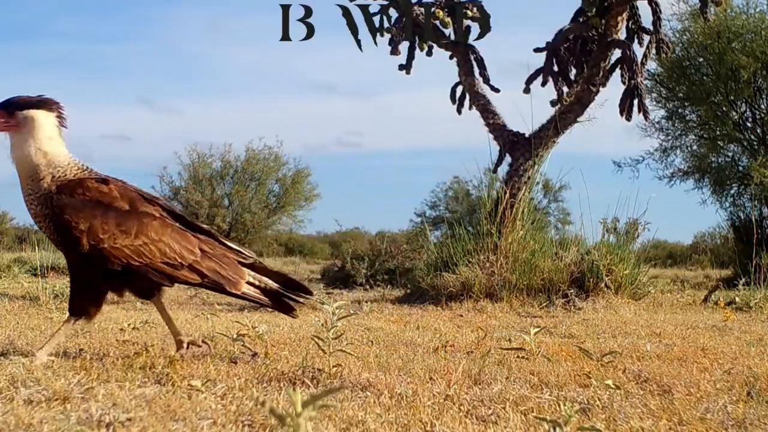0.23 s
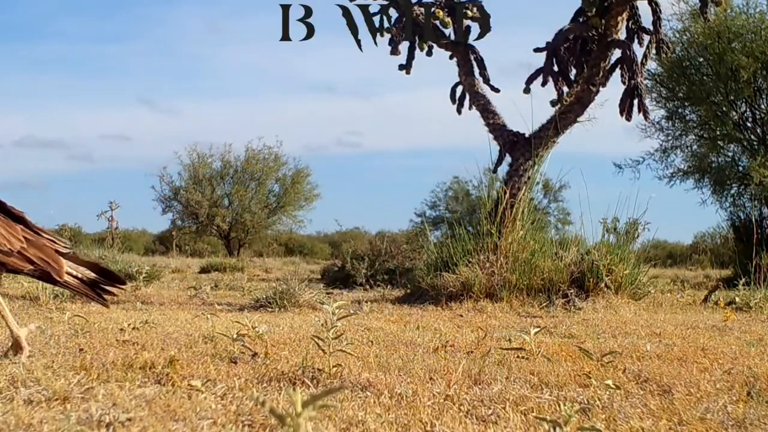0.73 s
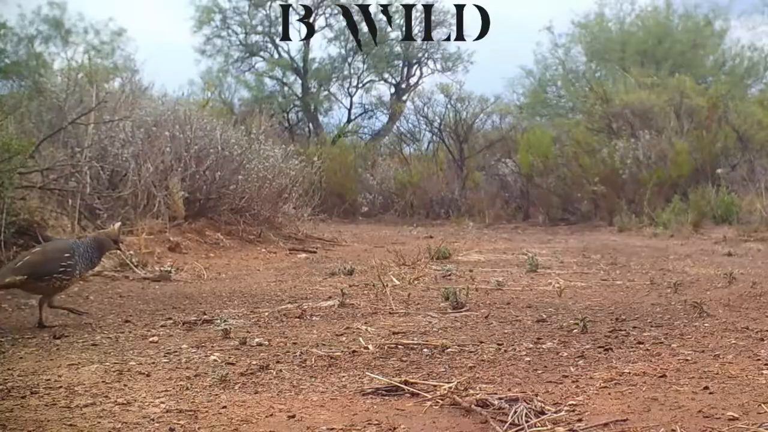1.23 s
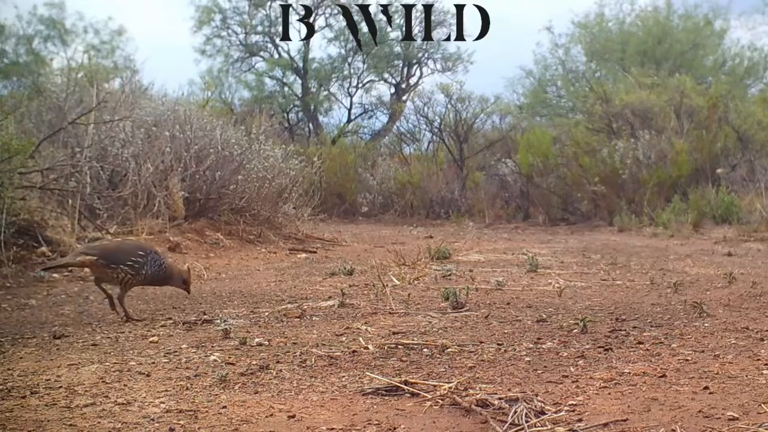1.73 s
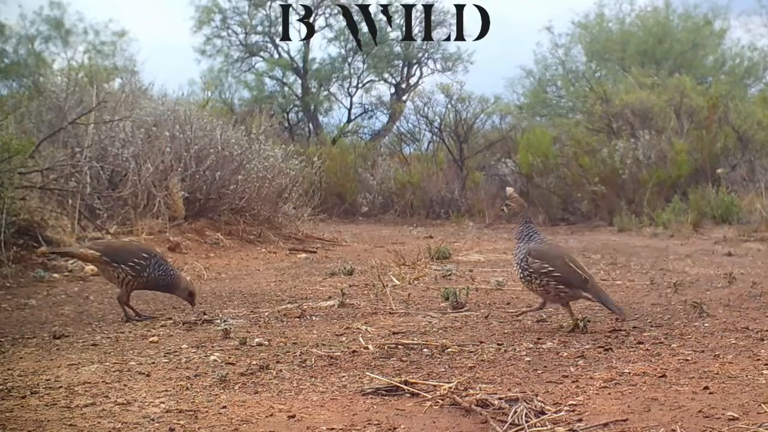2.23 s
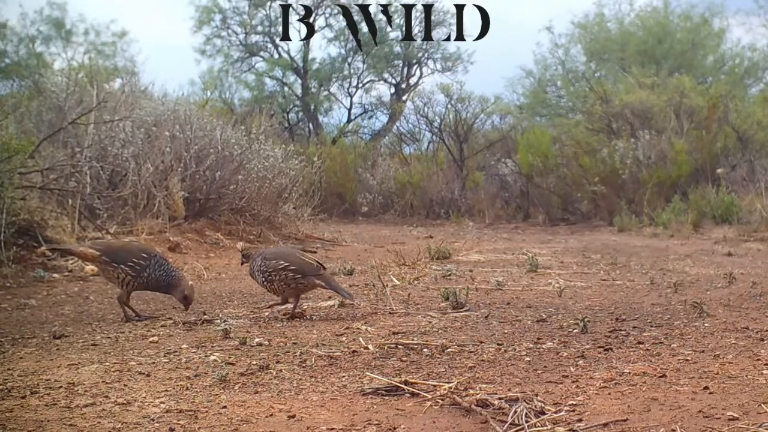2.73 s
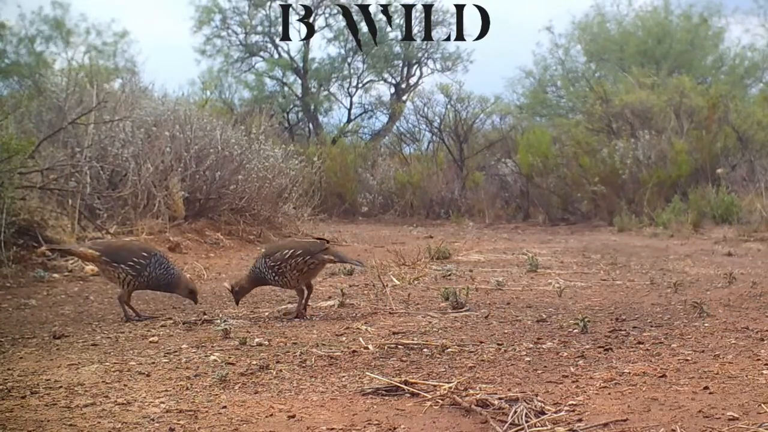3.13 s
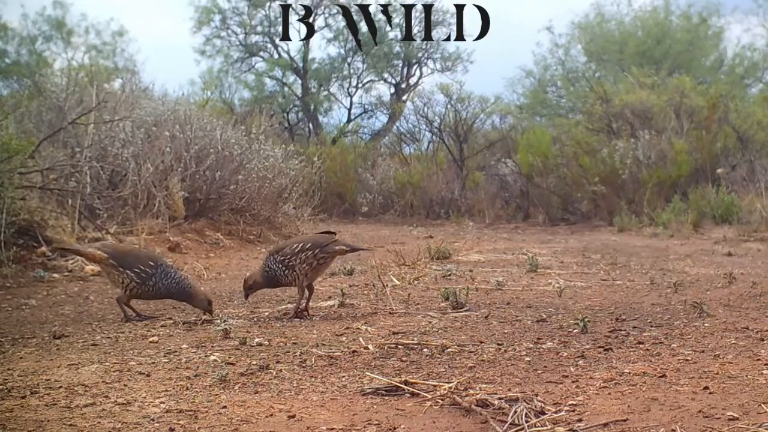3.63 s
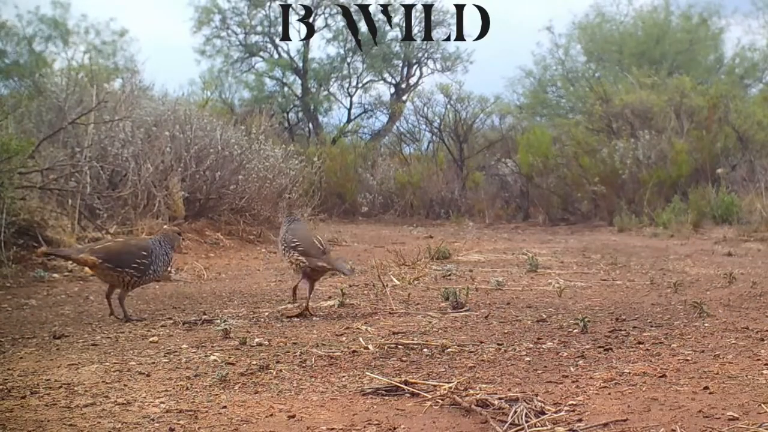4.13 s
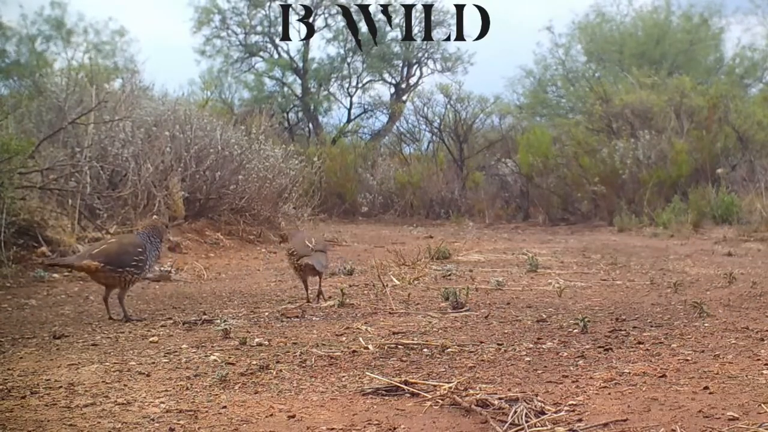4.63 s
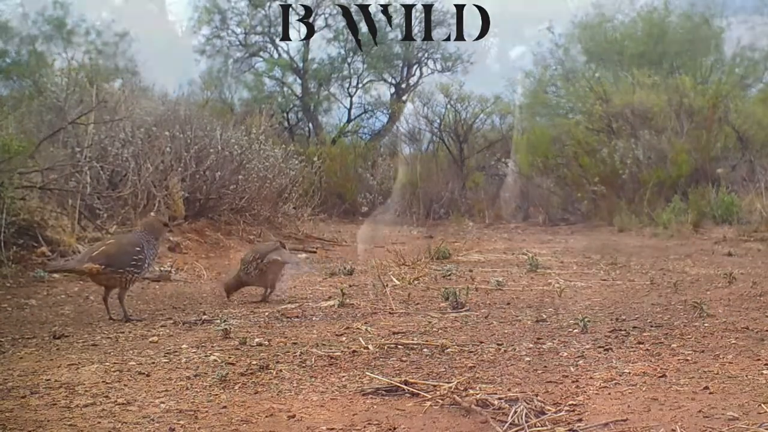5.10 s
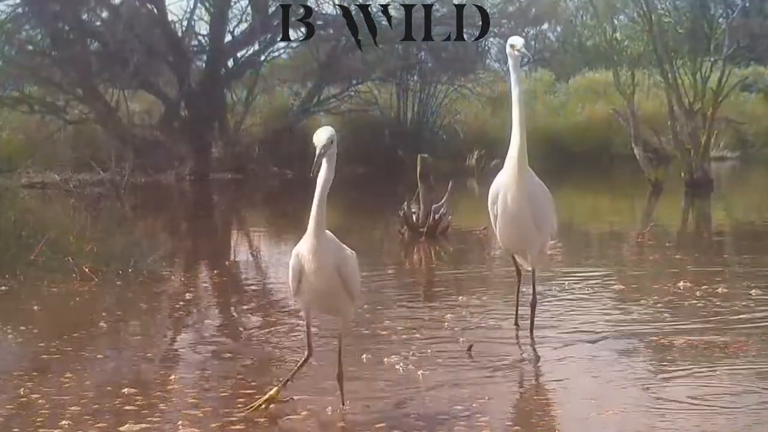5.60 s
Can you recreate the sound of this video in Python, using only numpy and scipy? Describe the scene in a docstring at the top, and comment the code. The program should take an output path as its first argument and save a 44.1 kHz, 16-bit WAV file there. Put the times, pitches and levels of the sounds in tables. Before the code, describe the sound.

Close to a small field camera in open dry scrub, a large bird gives a hollow knocking rattle in the first half second. Farther churrs then recur about every 0.8 seconds, with quick songbird whistles between. Ground birds make loud, abrupt chucks near 2.3, 2.9, 4.8 and 5.7 seconds. Wind thumps the microphone, bushes hiss, feet tick in litter, and a thin whine stays underneath.

```python
"""Dry scrubland near a small field camera: a large bird's rattling throat opens, as knocks ringing through resonances.
Ground birds then give loud short chucks, made of pulses and breath shaped by the beak.
A farther bird churrs in upward sweeps; sine tones make another bird's soft low coo and a songbird's two-sided voice.
Shaped noise makes the gusts on the microphone, the hissing bushes and the feet ticking in dry litter.
The camera electronics add a thin buzzing whine and a faint hiss."""
import sys
import numpy as np
from scipy import signal
from scipy.fft import rfft, irfft, next_fast_len
from scipy.io import wavfile
from scipy.ndimage import uniform_filter1d, map_coordinates

SR = 44100
rng = np.random.default_rng(int(sys.argv[2]) if len(sys.argv) > 2 else 0)


def boost(x):
    """Linear amplitude factor 10**(x/20) for a level x in decibels (scalar or array-like)."""
    u = np.asarray(x, float) / 20
    return 10 ** u


def dump(signal):
    """Clip the signal to [-1, 1] and save it as 16-bit WAV at the path in sys.argv[1]."""
    limited = np.clip(np.atleast_2d(signal).T, -1, 1)
    pcm = np.round(limited * 32767).astype(np.int16)
    wavfile.write(sys.argv[1], SR, pcm)


N = 258426  # length in samples
TIME = np.arange(N) / SR  # seconds


def unit(x):
    """Scale to an rms of 1."""
    return x / np.sqrt(np.mean(x ** 2) + 1e-20)


def curves(rows, outside=None):
    """Join the points of each column after the time with straight lines, one value per sample."""
    s, *columns = np.transpose(rows)
    return [np.interp(TIME, s, column, outside, outside) for column in columns]


def wobble(rate):
    """A smooth random curve through `rate` random points a second."""
    points = rng.standard_normal(int(N * rate / SR) + 4)
    return map_coordinates(points, [TIME * rate])


def filtered(x, response):
    """Multiply the spectrum of x by a response, a function of frequency in Hz."""
    size = next_fast_len(N + 8192)  # spare room for ringing
    return irfft(rfft(x, size) * response(np.fft.rfftfreq(size, 1 / SR)), size)[:N]


def colour(points):
    """Gain curve through (Hz, dB) points, read on a log frequency axis."""
    f, db = np.transpose(points)
    return lambda hz: boost(np.interp(np.log(hz + 1), np.log(f), db))


def causal(points):
    """The same gain curve with the phase of a real resonator: it rings only after the blow."""
    def response(hz):
        cepstrum = irfft(np.log(colour(points)(hz) + 1e-6))
        half = len(cepstrum) // 2
        # Folding the second half onto the first gives minimum phase.
        cepstrum[1:half] *= 2
        cepstrum[half + 1:] = 0
        return np.exp(rfft(cepstrum))
    return response


def throat(modes):
    """Add up resonances of (Hz, width Hz, dB), with every second one upside down."""
    def response(f):
        total = 0
        for k, (centre, width, db) in enumerate(modes):
            resonance = 1j * f * width / (centre * centre - f * f + 1j * f * width)
            total = total + (-1) ** k * boost(db) * resonance
        return total
    return response


def gate(start, end, fade):
    """Open between start and end, with soft edges lasting `fade` seconds."""
    return np.clip(np.minimum(TIME - start, end - TIME) / fade, 0, 1) ** 2


def hiss(points, patchy_db):
    """Coloured noise of rms 1 whose gain varies in random patches of time and frequency."""
    z = signal.stft(rng.standard_normal(N + 512), nperseg=512)[2]
    patches = uniform_filter1d(rng.standard_normal(z.shape), size=6, axis=0)
    patches = uniform_filter1d(patches, size=10, axis=1)
    noise = signal.istft(z * boost(patchy_db * unit(patches)), nperseg=512)[1][:N]
    return unit(filtered(noise, colour(points)))


def whine():
    """A thin tone whose phase slips back at every sensor frame, so it buzzes, over circuit hiss."""
    # states of the whine, each held until the next: t/s, level/dB, change in second half of each frame/dB
    states = [(0, -77.5, 0), (.535, -70.5, -8), (.81, -71.5, 0), (2.33, -69, -15.5), (2.87, -70, -8),
              (2.97, -70, -14), (3.05, -73, 2.5), (3.45, -69.5, -8.5), (5.25, -72.5, -6.5)]
    # colour of the circuit hiss: f/Hz, gain/dB
    self_noise = [(3000, -23), (6000, -1), (9000, -4), (12000, -1), (15700, -4.5)]
    whine_hz, frame_hz = 7768, 59.5
    s, db, dip_db = np.transpose(states)
    state = np.searchsorted(s[1:], TIME)
    frame = (TIME * frame_hz + .65) % 1  # place within the frame, 0 to 1
    level = boost(db[state] + dip_db[state] * (frame > .5))
    tone = np.sqrt(2) * level * np.sin(2 * np.pi * (whine_hz * TIME + 0.47 * frame))
    hiss_db = np.where(state > 0, -80, -84)  # a little softer in the first state
    return tone + boost(hiss_db) * hiss(self_noise, patchy_db=-3.0)


def gusty_wind():
    """Rumble and flutter levels in dB: the breeze, or a gust where it is stronger."""
    # breeze on the microphone between gusts: t/s, rumble/dB, flutter/dB (before a final trim)
    breeze = [(0, -86, -49), (.2, -70, -65), (.5, -86, -55), (.59, -47.5, -48), (1, -53, -57.5),
              (1.3, -49.5, -59), (1.75, -49.5, -56.5), (1.95, -50.5, -57), (2.3, -51.5, -50),
              (2.8, -52.5, -66.5), (3, -35.5, -42), (3.3, -42, -39.5), (3.7, -51.5, -57.5),
              (4.4, -64.5, -58), (4.85, -59.5, -57), (5.2, -46.5, -53), (5.4, -50.5, -52.5),
              (5.86, -40.5, -45.5)]
    # gust thumps: peak t/s, rise/s, fall/s (each spans 20 dB), rumble/dB, flutter/dB (before a final trim)
    gusts = [(.65, 0.029, 0.027, -41, -43), (.86, 0.054, 0.045, -44, -43), (1.041, .03, 0.17, -37.5, -44),
             (1.17, 0.013, 0.13, -38.5, -43.5), (1.31, .1, 0.047, -41, -40.5),
             (1.432, 0.0057, 0.02, -29.5, -23), (1.57, 0.075, 0.06, -35, -36.5),
             (1.7, 0.039, 0.057, -32.5, -29), (2.091, 0.015, 0.029, -33.5, -27.5),
             (2.25, 0.14, .03, -36, -41), (2.33, 0.044, 0.049, -40, -41), (2.877, .03, 0.062, -26, -18),
             (2.902, .04, .04, -38, -12.5), (2.92, 0.048, 0.1, -40, -20.5),
             (3.071, 0.11, 0.094, -29.5, -37.5), (3.132, 0.036, 0.049, -40, -19),
             (3.158, .04, 0.057, -36, -18), (3.179, 0.052, 0.094, -35.5, -22),
             (3.489, 0.14, 0.023, -32, -32), (3.62, 0.16, 0.11, -42, -42), (5.26, 0.19, .04, -40, -44),
             (5.632, 0.035, 0.044, -30, -18.5), (5.699, 0.089, 0.025, -34.5, -30.5),
             (5.86, 0.043, .05, -31.5, -39)]
    levels = np.array(curves(breeze))
    for s, rise, fall, *peak_db in gusts:
        drop_db = 20 * np.maximum((s - TIME) / rise, (TIME - s) / fall)
        levels = np.maximum(levels, np.c_[peak_db] - drop_db)
    return levels


def wind():
    """Lumpy eddies on the microphone port over the smooth hiss of air in the bushes."""
    # air in the bushes: t/s, dull hiss/dB, bright hiss/dB (before a final trim)
    bush_levels = [(0.0, -57, -86), (0.33, -58.5, -83), (0.44, -59, -83), (0.5, -53.5, -78),
                   (0.62, -50.5, -69), (0.77, -52, -75), (1.04, -50.5, -77), (1.24, -51.5, -78),
                   (2.12, -53, -77.5), (2.99, -52, -78.5), (3.16, -52, -76.5), (3.62, -53, -79.5),
                   (4.58, -53, -80), (4.85, -53.5, -78.5), (5.09, -54.5, -80), (5.37, -55, -80),
                   (5.66, -51, -73), (5.86, -51.5, -80.5)]
    # colours of the four noises, each: f/Hz, gain/dB
    rumble_colour = [(15, -29), (30, -4), (60, -4), (110, -7.5), (180, -12), (300, -57), (600, -120)]
    flutter_colour = [(70, -39.5), (130, -6.5), (220, -3.5), (350, -8.5), (600, -21.5), (1000, -36.5),
                      (2000, -70.5), (4000, -120)]
    dull_colour = [(120, -51), (200, -11), (295, -6.5), (388, -6.5), (475, -3.5), (617, -4), (682, -2),
                   (1860, -9), (2300, -12.5), (3990, -24.5), (5190, -48), (8780, -120)]
    bright_colour = [(2500, -33.5), (4000, 0), (5000, -3), (6500, -14), (9000, -22), (15000, -53)]
    rumble_db, flutter_db = gusty_wind()
    dull_db, bright_db = curves(bush_levels)
    eddy = wobble(25)  # shared by rumble and flutter
    rumble = unit(boost(0.4 * eddy + 2.1 * wobble(8)) * hiss(rumble_colour, patchy_db=1.6))
    flutter = unit(boost(1.8 * eddy + 4 * wobble(110)) * hiss(flutter_colour, patchy_db=1.5))
    dull = boost(dull_db + 4.0) * hiss(dull_colour, patchy_db=1.6)
    bright = boost(bright_db + 3.0) * hiss(bright_colour, patchy_db=2.0)
    return boost(rumble_db - 0.5) * rumble + boost(flutter_db - 5.0) * flutter + dull + bright


def feet():
    """Feet in dry litter: short crackles of bright noise with a duller scuff under them."""
    # ticks: t/s, level before trim/dB, dull part relative to that level/dB
    ticks = [(0.5356, -51.5, 4.5), (0.7971, -51, 3), (0.846, -46, 2), (0.9468, -45, 7), (1.065, -54, -9),
             (2.0014, -50, 2.5), (3.219, -53, -1), (4.351, -61.5, 16.5), (5.1374, -59.5, 15),
             (5.2485, -49.5, 0), (5.3024, -56.5, 10.5), (5.4494, -57, 7)]
    bright, dull = np.zeros(N), np.zeros(N)
    for s, db, dull_db in ticks:
        # 3 ms rise, then a fade of 60 dB in 0.13 s
        shape = np.clip((TIME - s) / 0.003, 0, 1) * boost(-60 * np.abs(TIME - s) / 0.13)
        bright += boost(db - 8.5) * shape
        dull += boost(db + dull_db + 1.5) * shape
    crackle = hiss([(1500, -21), (3000, 0), (5000, -3), (6500, -16), (15000, -50)], patchy_db=1.5)
    scuff = hiss([(300, -20), (700, -2), (1800, 0), (2800, -8), (4000, -35), (8000, -90)], patchy_db=1.5)
    return bright * crackle + dull * scuff


def coo_and_songbird():
    """Sine voices with a slight waver; in the buzzy stretches the pitch flutters fast."""
    # buzzy stretches: start/s, end/s, flutter rate/Hz, pitch swing/Hz
    buzzes = [(1.401, 1.436, 166.5, 343), (1.58, 1.603, 200, 246), (1.714, 1.723, 199, 403),
              (2.021, 2.038, 130.8, 435), (2.16, 2.193, 213.3, 157), (5.518, 5.602, 212, 121)]
    # plain notes, after a soft low coo from another bird: start/s, length/s, from f/Hz, to f/Hz, level/dB
    notes = [(0.132, 0.17, 595, 587, -52.5), (.751, .011, 2340, 2450, -53), (0.767, 0.021, 2340, 2510, -45),
             (0.819, 0.16, 2539, 2482, -35.5), (1.181, 0.085, 3345, 3484, -42),
             (1.192, 0.069, 3170, 3280, -47), (1.314, 0.0113, 4080, 4100, -60),
             (1.41, 0.027, 814, 966, -48.5), (1.63, 0.065, 2010, 1866, -30.5),
             (1.751, 0.03, 1153, 1054, -47), (1.788, 0.022, 887, 876, -43), (1.973, 0.047, 3553, 3720, -60),
             (1.975, .05, 837, 883, -50), (2.114, 0.015, 2720, 2750, -38.5),
             (2.126, 0.016, 4300, 3900, -44), (2.173, 0.027, 912, 910, -43.5),
             (2.195, .048, 4050, 4150, -64), (2.35, .12, 5270, 5620, -82), (2.654, 0.021, 1760, 1700, -48),
             (4.982, 0.043, 4670, 3600, -67), (5.372, 0.024, 3850, 3670, -57),
             (5.612, 0.12, 4210, 4190, -66)]
    # bent sweeps from both sides of the voice box, each a list of points: t/s, f/Hz, level/dB
    sweeps = [
        [(1.336, 4139, -60.5), (1.366, 4192, -46.5), (1.402, 4230, -48), (1.415, 3471, -45), (1.435, 2496, -36),
         (1.449, 2460, -28.5), (1.485, 2480, -67)],
        [(1.4, 3914, -46), (1.422, 2480, -37), (1.44, 2330, -39)],
        [(1.54, 5707, -75), (1.565, 5770, -66.5), (1.582, 5470, -63), (1.602, 3670, -44.5), (1.628, 3570, -60)],
        [(1.703, 3266, -33.5), (1.713, 3160, -50), (1.723, 2385, -33), (1.742, 2425, -50)],
        [(1.973, 2097, -44), (1.995, 2416, -26), (2.021, 3170, -37), (2.051, 3594, -36.5), (2.112, 3500, -44)],
        [(1.973, 1777, -43), (1.991, 2090, -31), (2.019, 2570, -46), (2.033, 2600, -32.5), (2.048, 2592, -58.5)],
        [(2.142, 3530, -73), (2.152, 3219, -51), (2.174, 2700, -40.5), (2.188, 1900, -41.5), (2.198, 1800, -44)],
        [(2.145, 4300, -62), (2.155, 4800, -56), (2.17, 4150, -55), (2.182, 3200, -49), (2.195, 2200, -60)],
        [(2.645, 890, -50), (2.673, 919.9, -40), (2.687, 1976, -59), (2.705, 2780, -55), (2.738, 2727, -65)],
        [(5.238, 3880, -70), (5.25, 3980, -61), (5.29, 4230, -63), (5.35, 4150, -76)],
        [(5.527, 4700, -63), (5.542, 3760, -60), (5.556, 4770, -67), (5.565, 4350, -57.5), (5.59, 3070, -59.5)],
    ]
    note_rise, note_fall = .25, 0.16  # shares of a note's length
    flutter_hz = np.zeros(N)
    for start, end, rate_hz, swing_hz in buzzes:
        flutter_hz += swing_hz * gate(start, end, 0.0038) * np.sin(2 * np.pi * rate_hz * TIME)
    waver = 1 + 0.0015 * wobble(120)
    voices = np.zeros(N)

    def add_sine(s, hz, level):
        """Add one sine, following pitch points, wherever its level is above zero."""
        on = level > 0
        pitch_hz = np.interp(TIME[on], s, hz) * waver[on] + flutter_hz[on]
        phase = 2 * np.pi * np.cumsum(pitch_hz) / SR
        voices[on] += np.sqrt(2) * level[on] * np.sin(phase)

    for s, length, from_hz, to_hz, db in notes:
        share = (TIME - s) / length  # how far through the note
        swell = np.clip(np.minimum(share / note_rise, (1 - share) / note_fall), 0, 1)
        add_sine([s, s + length], [from_hz, to_hz], boost(db) * swell)
    for rows in sweeps:
        s, hz, db = np.transpose(rows)
        edges = gate(s[0] - .002, s[-1] + .002, 0.0018)
        add_sine(s, hz, boost(np.interp(TIME, s, db)) * edges)
    return voices


def churrs():
    """Each beat sweeps upward through the throat's notes, the low note first, with some scratch on it."""
    # churrs: start/s, end/s, beat rate/Hz, level of the upper notes before swell/dB, low note relative/dB
    calls = [(0.789, 1.045, 80.4, -43, -15), (1.566, 1.838, 80.6, -43, -8), (2.362, 2.634, 82.1, -42, -11),
             (3.141, 3.417, 80.1, -42.5, -12.5), (3.972, 4.222, 80.4, -41.5, -13),
             (4.772, 5.016, 78, -37, -4.5), (5.459, 5.712, 79.24, -37, -4.5)]
    # churring throat resonances, the low note first: f/Hz, width/Hz, gain/dB
    churr_throat = [(1184, 260, 0), (1652, 143, 0.5), (2197, 140, -1), (2710, 215, -2), (3370, 80, -11.5)]
    low_throat, upper_throat = throat(churr_throat[:1]), throat(churr_throat[1:])
    dull = colour([(3600, 2.5), (5000, -44.0), (8000, -88)])
    out = np.zeros(N)
    for start, end, beat_hz, db, low_db in calls:
        beat = (beat_hz * (TIME - start) + 0.051 * wobble(40)) % 1  # place within the beat
        arch = np.sin(np.pi * np.clip((TIME - start) / (end - start), 0, 1))  # mid-churr beats reach higher
        sweep_hz = 1150 + (1100 + 700 * arch) * beat ** 1.3 + 120 * wobble(150)
        tone = np.sin(2 * np.pi * np.cumsum(sweep_hz) / SR) * boost(1.5 * wobble(120))
        source = tone + .7 * rng.standard_normal(N)
        source = filtered(source * np.sin(np.pi * beat) ** 4, dull)
        upper = unit(filtered(source * beat, lambda f: upper_throat(f) * (f > 1400)))
        lower = unit(filtered(source * (1 - beat) ** 2, lambda f: low_throat(f) ** 2))
        swell = boost(-7 * np.clip(1 - (TIME - start) / 0.11, 0, 1))  # starts 7 dB softer
        loudness = boost(db) * swell * gate(start, end, 0.023) * boost(1.2 * wobble(14))
        out += loudness * (upper + boost(low_db) * lower)
    return out


def knocks():
    """Rows of time, level and bright level: a roll starts hesitantly, then settles to an even beat."""
    # rolls of throat knocks: first knock t/s, length/s, gap/s, later knocks come early by/s,
    # base level/dB, first knock softer by/dB, bright part at the start/dB, fade at the end/dB
    rolls = [(0.011, .115, .023, -.0045, -30, 3, -40, 12),
             (0.247, .389, .0278, .006, -26.5, 13, -35.5, -0.5)]
    settle = 0.32  # what is left of the hesitant start after each knock
    brighten_db_per_s = 28.5  # the scratch grows along a roll
    rows = []
    for start, length, gap, early, db, soft_db, bright_db, fade_db in rolls:
        k = np.arange(round(length / gap) + 1)
        left = settle ** k
        s = start + k * gap - early * (1 - left)
        knock_db = db - soft_db * left - fade_db * settle ** k[::-1]
        rows += zip(s, knock_db, bright_db + brighten_db_per_s * k * gap)
    return rows


def rattle():
    """Each knock is a slap and two mostly weaker rebounds ringing the throat, each with a bright scratch."""
    # rattling throat resonances: f/Hz, width/Hz, gain/dB
    rattle_throat = [(259, 320, 1), (506, 510, 2.5), (1080, 117, 1.5), (1330, 126, 2.5), (1950, 190, -3),
                     (2800, 360, -7.5)]
    slaps, clicks = np.zeros(N), np.zeros(N)
    rows = knocks()
    chances = rng.standard_normal((len(rows), 3))
    for (s, db, bright_db), chance in zip(rows, chances):
        for lag, rebound_db, c in zip([.0015, .0054, .0088], [27, 23, 19], chance):
            at = round((s + lag + 0.0002 * c) * SR)
            slaps[at] -= boost(db + rebound_db + 1.9 * c)
            clicks[at] = boost(db + bright_db + rebound_db - 0.5)
    body_colour = causal([(150, -10.0), (400, 1.0), (1300, 1.0), (2200, 2.5), (2700, -14.5), (8000, -42)])
    body = filtered(filtered(slaps, throat(rattle_throat)), body_colour)
    fade = boost(-60 * np.arange(200) / SR / 0.014)  # 60 dB per 14 ms, cut after 200 samples
    scratch = np.convolve(clicks, fade)[:N] * rng.standard_normal(N) + 1.8 * clicks
    scratch_colour = causal([(2500, -11), (3300, -10.0), (4150, -7), (4900, -21), (6000, -44), (9000, -90)])
    return body + filtered(scratch, scratch_colour)


def chucks():
    """Shaky glottal pulses whose pitch arches, mixed with breath gated once a cycle, coloured by the beak."""
    # chucks: peak t/s, rise/s, fall/s, top pitch before shake/Hz, level at the peak/dB,
    # beak opening/0-1, strong-weak alternation of pulses/0-1
    calls = [(2.323, 0.017, 0.0165, 879, -9, 0.87, 0.09), (2.949, 0.021, 0.0198, 990.6, -9.5, 0.81, 0.17),
             (4.785, .021, .021, 949, -11, 0.56, .15), (5.709, .018, .018, 847, -11, 0.72, 0.22)]
    # colour with the beak closed, then open: f/Hz, gain/dB
    beak_closed = [(250, -83.5), (600, -13), (950, -5.5), (1300, -1), (1800, -4.5), (2600, -1),
                   (3400, -52.5), (4200, -26), (7000, -48), (15000, -68.5)]
    beak_open = [(250, -69.5), (600, -6), (900, -11.5), (1300, -6), (1700, -11.5), (2500, -1.5),
                 (3300, -11), (4200, -32.5), (7000, -52.5), (15000, -48.5)]
    slack_pitch = .68  # pitch without effort, as a share of the top pitch
    beak_shuts = .7  # share of the opening lost as effort falls away
    muffled, muffle_hz = 0.29, 1750  # share of the voice dulled without effort, above this frequency
    out = np.zeros(N)
    for s, rise, fall, top_hz, db, beak, alternate in calls:
        effort = np.interp(TIME, [s - rise, s, s + fall], [0, 1, 0])  # pressure, not dB, moves in straight lines
        hz = top_hz * (slack_pitch + (1 - slack_pitch) * effort)
        phase = 2 * np.pi * np.cumsum(hz * (1 + .035 * wobble(400))) / SR
        pulses = sum(np.cos(k * phase + .5 * wobble(500)) for k in range(1, 9))
        pulses = pulses * boost(1.8 * wobble(900))
        pulses = pulses * (1 + alternate * np.cos(phase / 2))
        breath = (1 + np.cos(phase)) * rng.standard_normal(N)
        source = unit(pulses) + .62 * unit(breath)
        slack = np.clip(muffled * (1 - effort), 0, 1)
        dulled = filtered(source, lambda f: 1 / (1 + 1j * f / muffle_hz) ** 2)
        source = (1 - slack) * source + slack * dulled
        # the same source through two beak shapes
        closed = filtered(source, causal(beak_closed))
        opened = filtered(source, causal(beak_open))
        opening = np.clip(beak * (1 - beak_shuts * (1 - effort) * (TIME > s)), 0, 1)
        voice = (1 - opening) * unit(closed) + opening * unit(opened)
        out -= boost(db) * effort * gate(s - rise, s + fall, 0.0041) * voice
    return out


def scrub(x):
    """A short diffuse answer from bushes and ground: noise from 4 ms on, fading 60 dB in 98 ms."""
    t = np.arange(SR // 4) / SR
    tail = rng.standard_normal(len(t)) * boost(-60 * t / 0.098) * (t > .004)
    return signal.fftconvolve(x, tail / np.linalg.norm(tail))[:N]


def scene():
    """Mix all outdoor sounds: near birds are dry, far birds get more of the answer from the scrub."""
    near = chucks() + rattle()
    far = churrs() + coo_and_songbird()
    answer = scrub(boost(-21.5) * near + boost(-10) * far)
    return (near + far + answer + feet() + wind())[None]


def top_cut(x):
    """Nothing passes above the cut-off."""
    return signal.sosfilt(signal.butter(12, 15760, fs=SR, output="sos"), x)


def record(dry):
    """The preamplifier bends softly on the loudest peaks, and the electronics add their whine."""
    bent = dry / (1 + np.abs(dry / .9) ** 4) ** (1 / 4)
    return top_cut(bent + whine())


dry = scene()
out = record(dry)
dump(out)
```